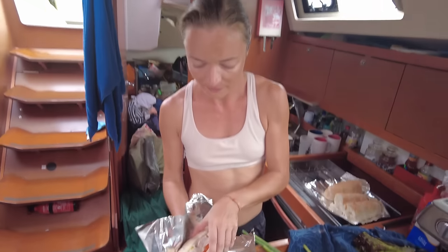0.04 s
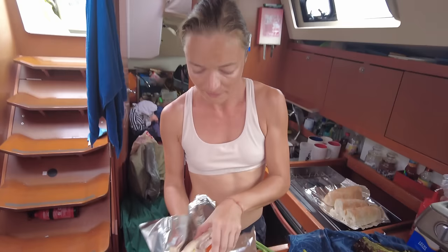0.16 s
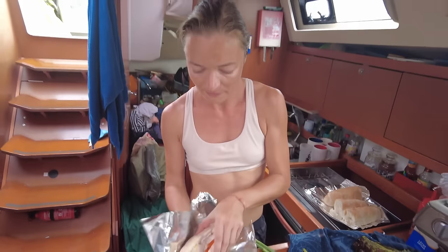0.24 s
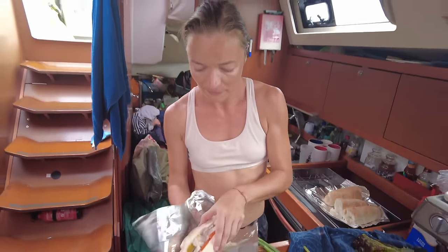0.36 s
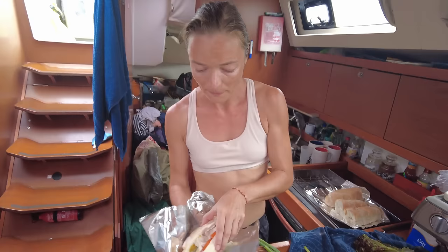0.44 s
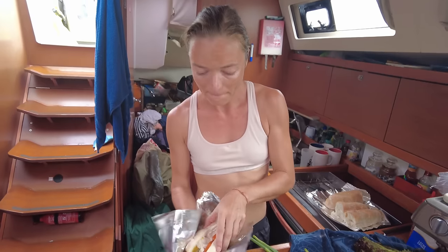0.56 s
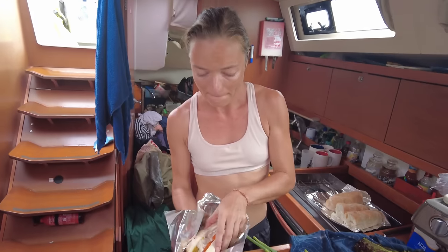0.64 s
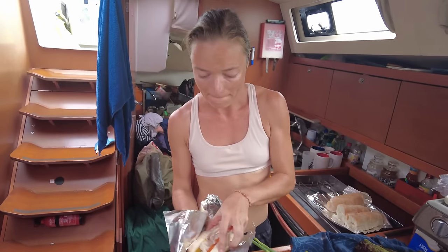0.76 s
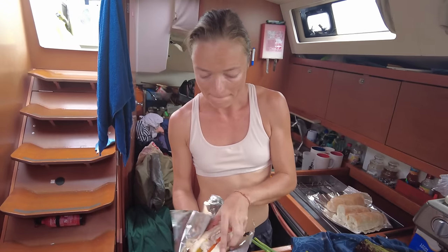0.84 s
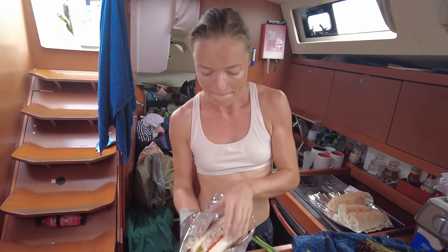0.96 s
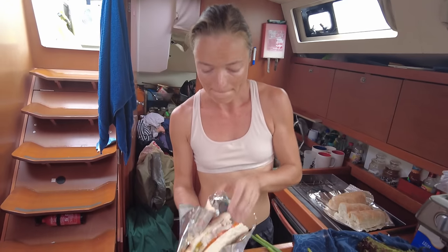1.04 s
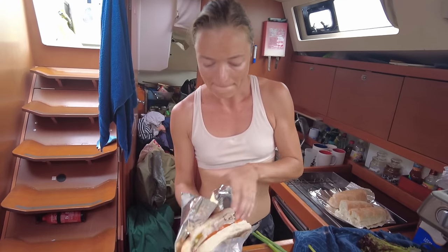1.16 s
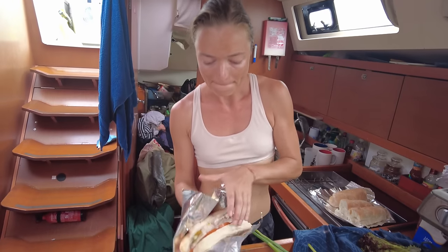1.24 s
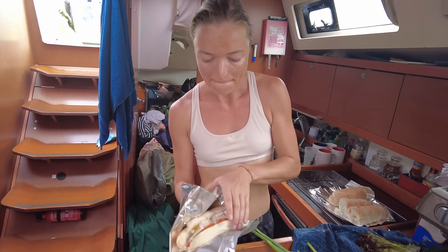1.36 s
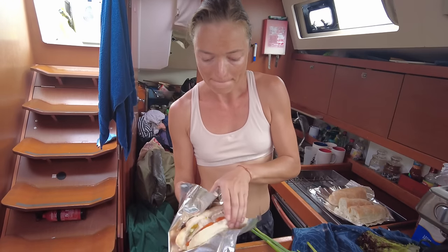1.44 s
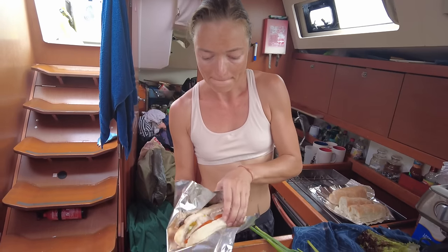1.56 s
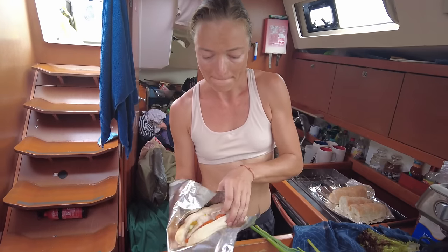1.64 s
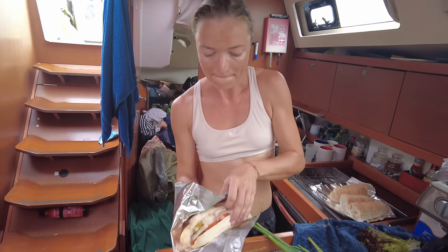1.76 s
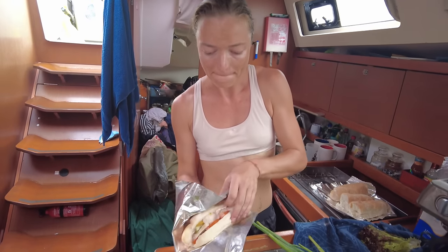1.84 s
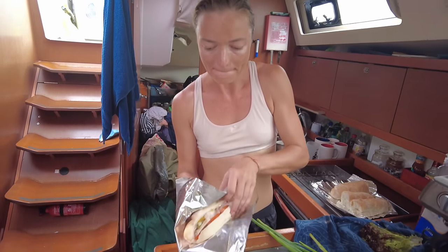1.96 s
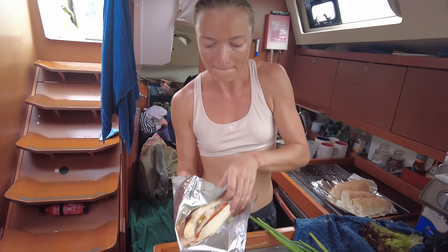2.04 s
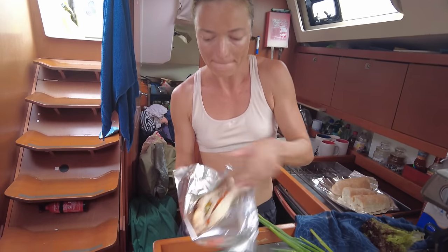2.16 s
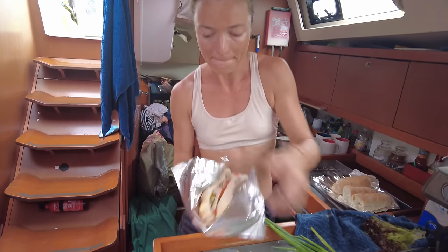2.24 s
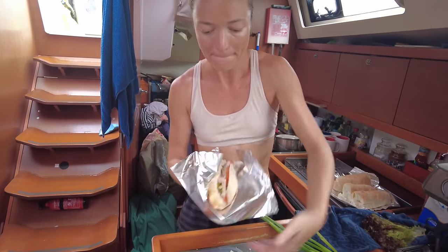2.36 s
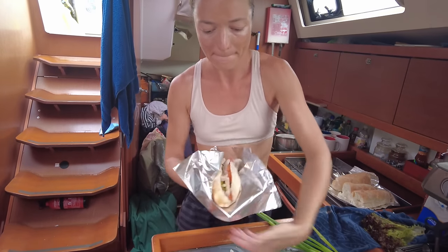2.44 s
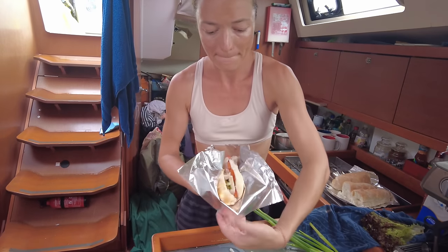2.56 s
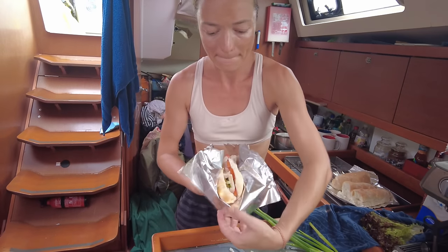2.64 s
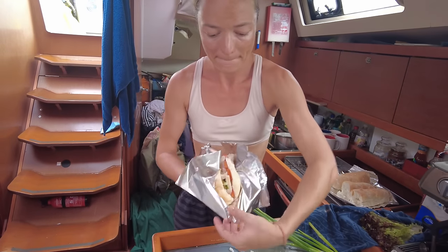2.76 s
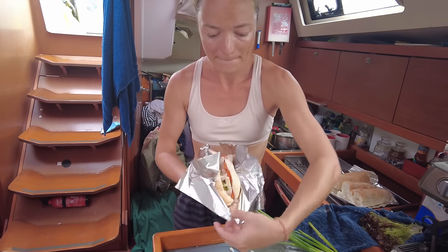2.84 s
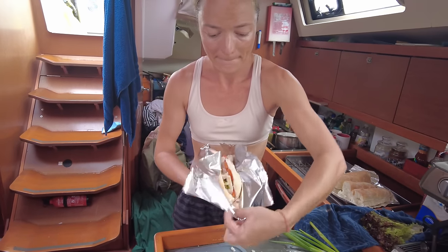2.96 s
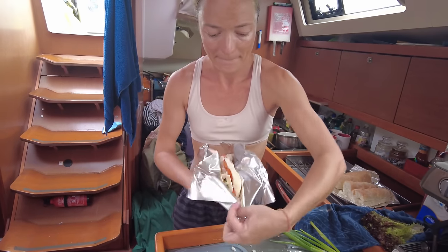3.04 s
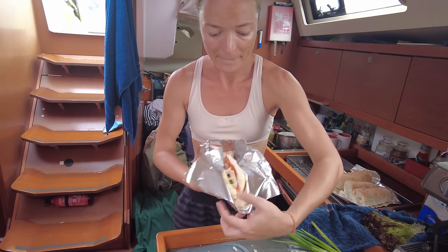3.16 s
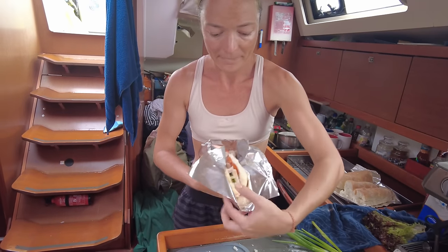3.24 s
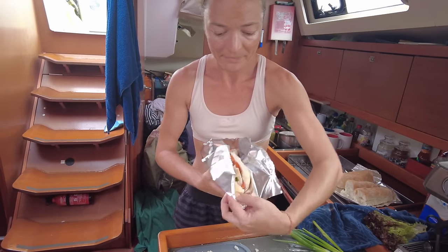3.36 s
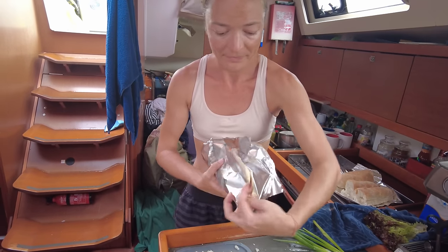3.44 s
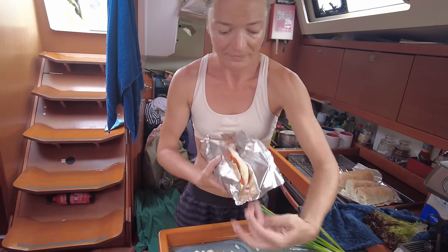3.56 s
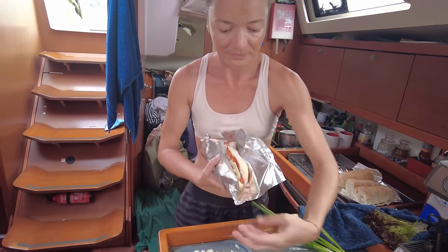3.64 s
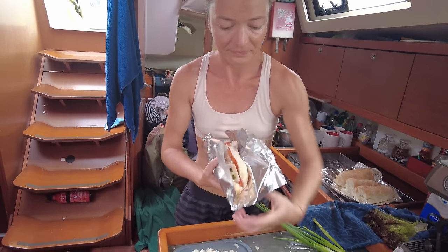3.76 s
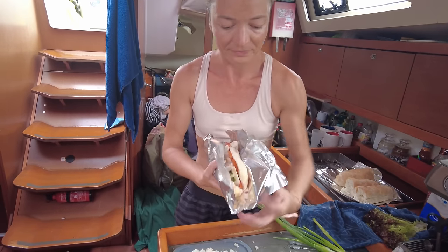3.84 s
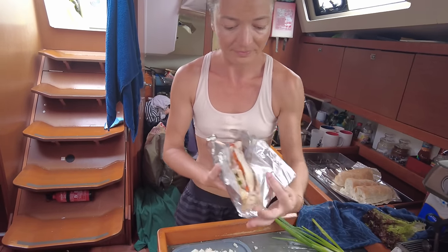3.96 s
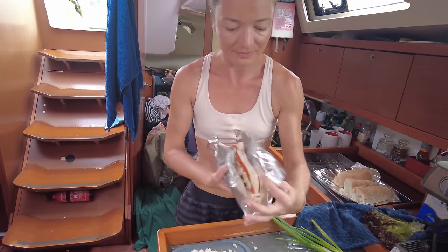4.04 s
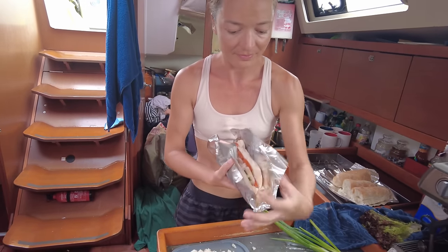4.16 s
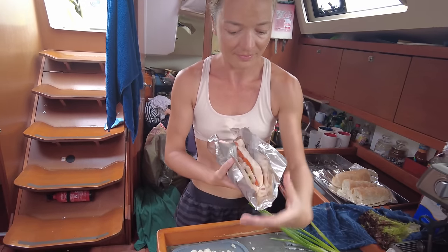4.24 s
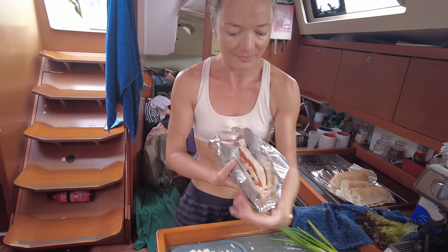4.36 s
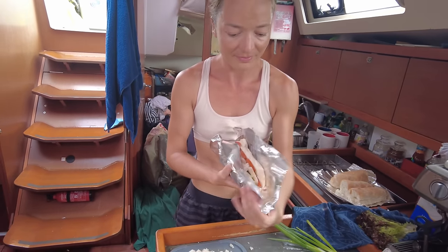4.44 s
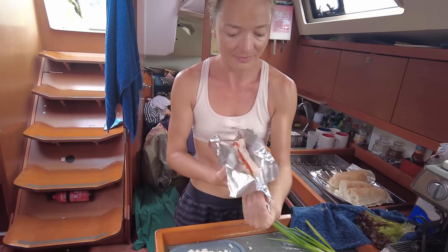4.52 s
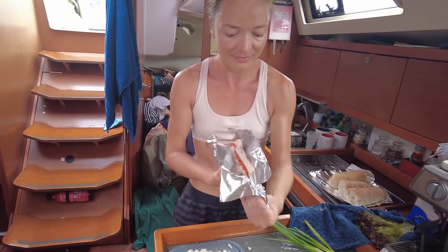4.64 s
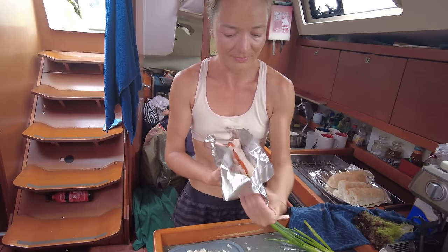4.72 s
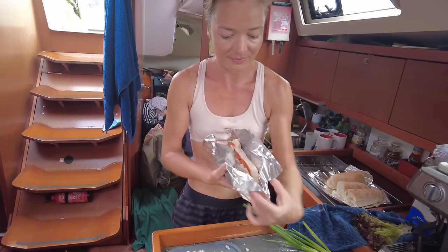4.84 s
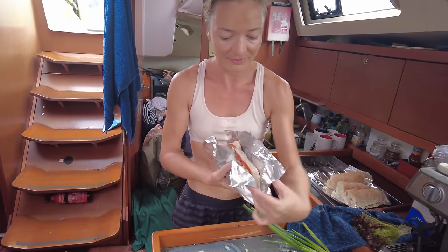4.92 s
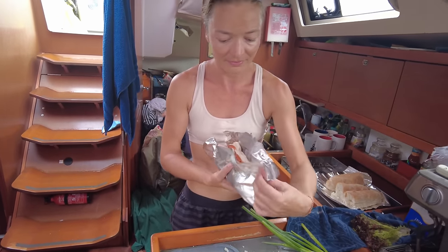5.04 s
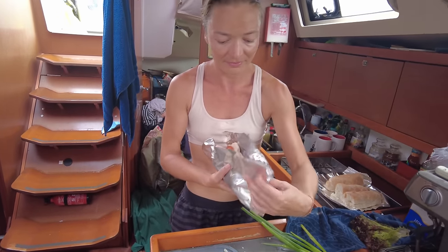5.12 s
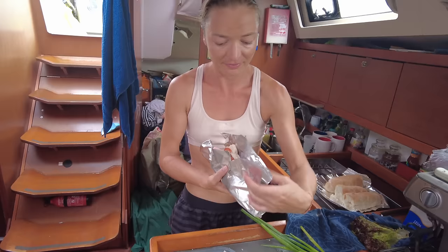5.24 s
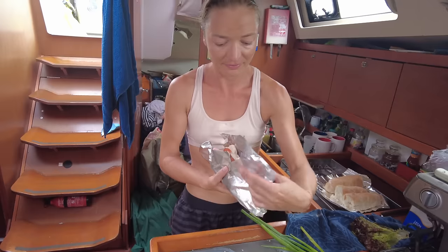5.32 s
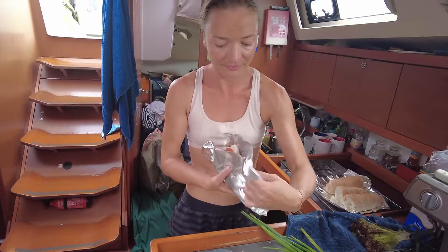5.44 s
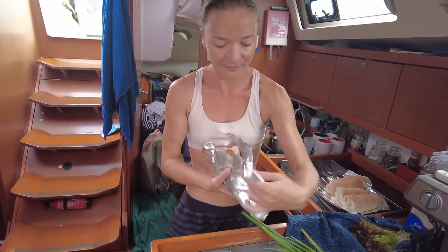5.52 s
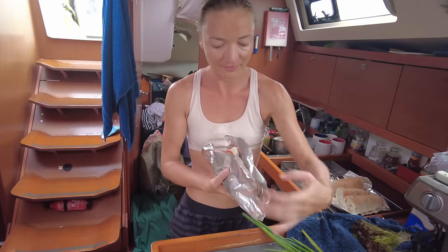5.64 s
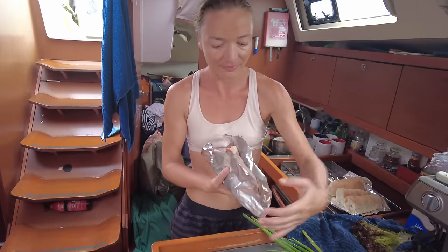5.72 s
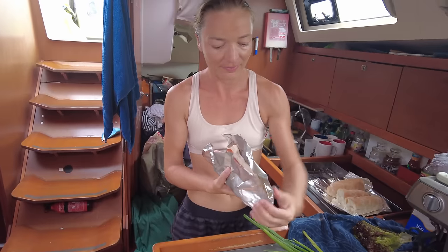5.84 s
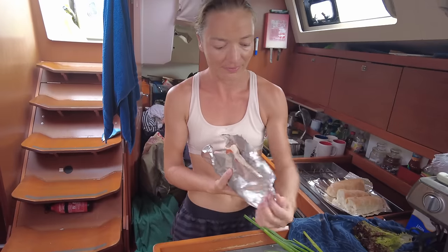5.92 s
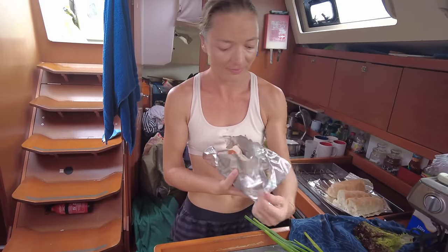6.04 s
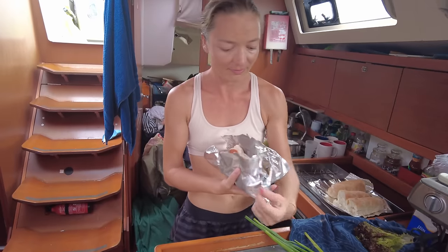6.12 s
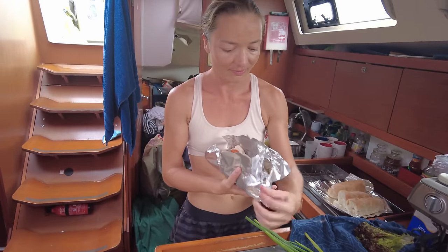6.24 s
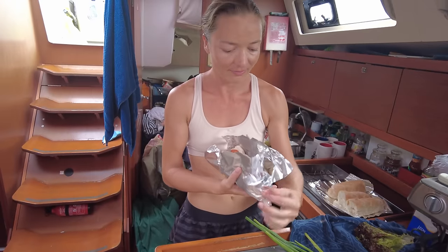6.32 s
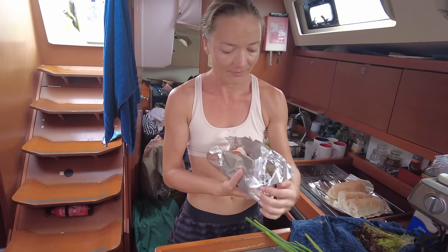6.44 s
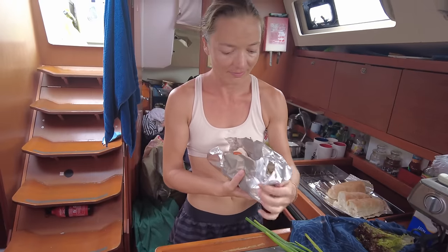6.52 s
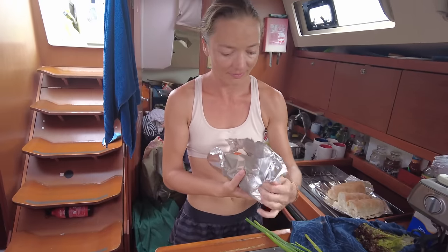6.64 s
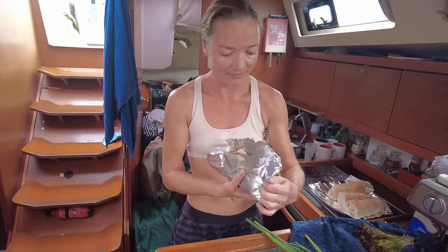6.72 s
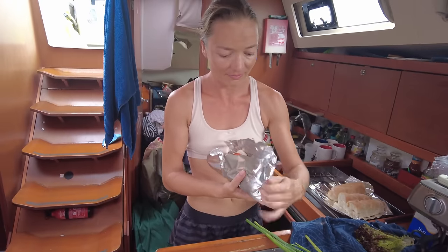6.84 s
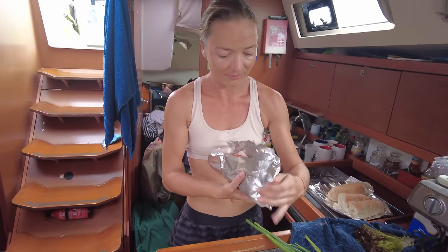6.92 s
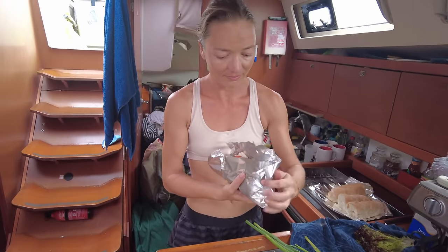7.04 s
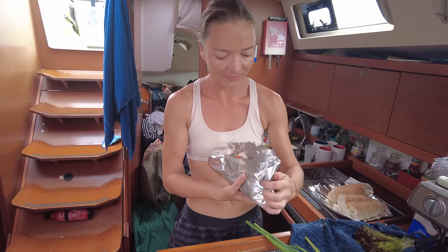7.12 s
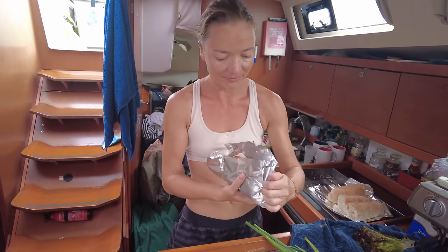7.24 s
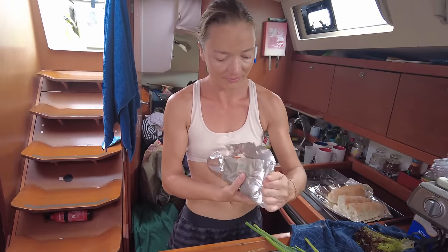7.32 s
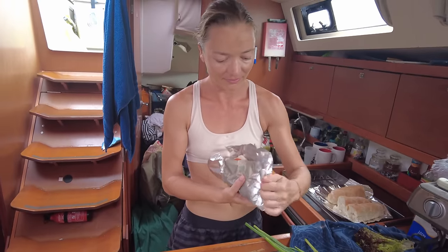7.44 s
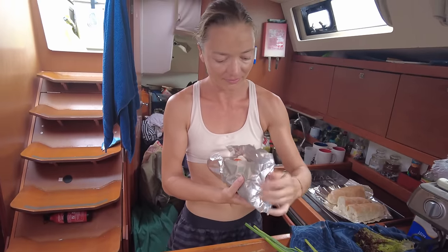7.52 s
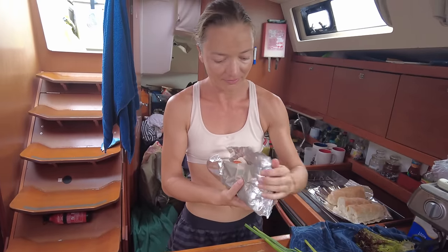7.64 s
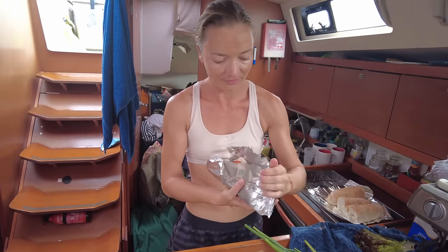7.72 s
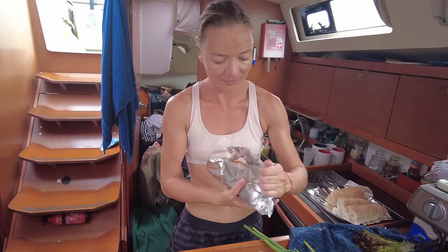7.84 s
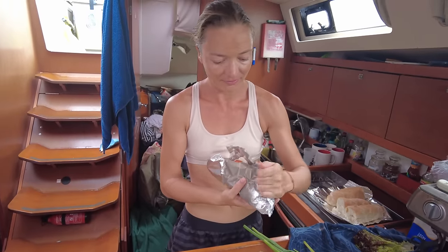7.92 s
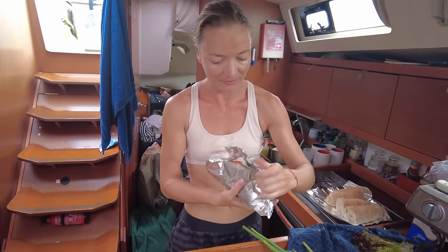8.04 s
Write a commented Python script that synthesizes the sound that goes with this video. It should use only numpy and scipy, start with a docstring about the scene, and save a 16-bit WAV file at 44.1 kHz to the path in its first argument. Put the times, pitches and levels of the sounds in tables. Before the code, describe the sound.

Close, bright foil crinkling with sharp snaps and a few soft hollow pats, over faint air noise and low machine hum.

```python
"""Foil wrapped around a sandwich

Aluminium foil is folded and pressed by hand around a sandwich in a small wood-panelled galley.
Finger pushes buckle creases in swarms of tiny clicks; larger facets snap in short avalanches, flat
patches ring, facets squeak, and the hand pats and squeezes the hollow parcel: filtered impulses, decaying
sines and resonated noise. Close walls thicken every click; air noise and machine hum lie underneath."""
import sys
import numpy as np
from scipy import signal
from scipy.fft import rfft, irfft
from scipy.io import wavfile
from scipy.ndimage import uniform_filter1d

SR = 44100
rng = np.random.default_rng(int(sys.argv[2]) if len(sys.argv) > 2 else 0)


def store_wav(level_fs):
    """Save 16-bit WAV to argv[1]."""
    pcm = np.round(np.clip(np.atleast_2d(level_fs), -1, 1) * 32767)
    wavfile.write(sys.argv[1], SR, pcm.T.astype(np.int16))


N = 356416
# large facets that snap through: start_s, relative_level_db, facet_pitch_hz, low_share_db
FACET_SNAPS = [(0.0381, -20.5, 7640.0, 5), (0.1037, -23, 2760.0, -1), (0.143, -19.5, 5710.0, -1),
               (0.182, -15, 6900, -1), (0.309, -16.0, 6200, -3), (0.426, -17.5, 9500.0, -5),
               (0.859, -20.5, 5310.0, -1), (0.9367, -10, 2740, -8), (0.969, -18, 3400, -3),
               (1.094, -14.5, 9160.0, 3.5), (1.3337, -18, 9500.0, 2), (1.463, -18.5, 3310.0, -8),
               (1.589, -21, 2300, 0), (1.848, -25.5, 7920.0, 1.5), (2.002, -20.5, 9500.0, -5),
               (2.04, -14.5, 4590.0, -5), (2.2333, -25.5, 9500.0, 0), (2.282, -14.5, 2300.0, -5),
               (2.537, -36, 6600.0, 5), (2.569, -25.5, 9600, -4), (2.661, -24, 2970.0, 4),
               (2.704, -14, 7100.0, -3.5), (2.759, -12.5, 9500.0, -1), (2.8409, -16.5, 6370.0, 2.5),
               (2.946, -18, 2300.0, 5), (3.025, -9.5, 9500.0, 1), (3.3716, -13, 5920.0, -5),
               (3.4505, -8.5, 7640.0, -7), (3.8496, -43, 3560.0, 2), (3.932, -24.5, 6370.0, 1),
               (3.9564, -14, 9500.0, -12), (4.028, -14, 4200, -2), (4.061, -9, 9400, 0),
               (4.112, -12, 7200, 4), (4.156, -18, 9000, 5.5), (4.245, -15, 9600, -1.5),
               (4.428, -49, 6200, -3), (4.459, -43, 6000, 3), (4.485, -20, 9500.0, 1),
               (4.621, -16.5, 2300.0, -0.5), (4.715, -19, 5300, 5), (4.7738, -16, 7640.0, 1),
               (4.8596, -18.5, 3080.0, -2), (5.157, -13.5, 4270.0, 3), (5.5997, -12.5, 4760.0, -9),
               (5.639, -14, 3310.0, -5), (5.882, -23, 4270.0, -14), (5.956, -20, 4590.0, 0),
               (5.966, -14.5, 4120.0, 1), (6.084, -12.5, 7100.0, 6), (6.384, -23.5, 3080.0, -4),
               (6.47, -21.5, 6370.0, 4.5), (6.609, -14.5, 8520.0, 1.5), (6.7184, -12.5, 3460, 3.5),
               (6.797, -22, 3970.0, 1), (6.9035, -24, 6200, -4), (7.006, -15, 3690.0, 7.5),
               (7.153, -19, 9500.0, 0), (7.226, -24, 7900, 0), (7.306, -18.5, 4430.0, 9),
               (7.3824, -15, 4900, 0.5), (7.5913, -18, 4940.0, -6), (7.681, -27.5, 6600.0, 1),
               (7.712, -27.5, 3690.0, 11), (7.7453, -16.5, 5120.0, -4), (7.946, -14.5, 4000, -6)]
# colour of the crumpling sheet: frequency_hz, relative_level_db
SHEET_COLOUR = [(60, -27), (170, -10.5), (300, -9.5), (470, -3.5), (700, -5), (1100, -4), (1900, -6),
                (2750, -2.5), (3600, -3.5), (4600, 1), (5800, -1), (7300, 1.5), (11000, -4), (16000, -7)]
# bands of about a third of an octave
EDGES_HZ = np.geomspace(90, 17500, 25)
CENTRES_HZ = np.sqrt(EDGES_HZ[1:] * EDGES_HZ[:-1])


def from_db(db):
    """Decibels to gain."""
    return 10 ** (np.asarray(db) / 20)


def rms_one(x):
    """Scale to rms 1."""
    return x / np.sqrt(np.mean(x ** 2) + 1e-20)


def in_time(rows):
    """Interpolate each column of a curve at every sample."""
    s, *columns = np.transpose(rows)
    return [np.interp(np.arange(N) / SR, s, column) for column in columns]


def at_hz(points, hz):
    """Read a table on a log-frequency axis."""
    table_hz, values = np.transpose(points)
    return np.interp(np.log(hz), np.log(table_hz), values)


def bandpass(x, edges_hz):
    """Butterworth band-pass."""
    sos = signal.butter(2, edges_hz, "band", fs=SR, output="sos")
    return signal.sosfilt(sos, x + 1e-18)


def resonate(x, hz, width_hz):
    """Two-pole resonance with gain 1 on top."""
    r = np.exp(-np.pi * width_hz / SR)
    zeros = np.array([1, 0, -1]) * (1 - r * r) / 2
    poles = [1, -2 * r * np.cos(2 * np.pi * hz / SR), r * r]
    return signal.lfilter(zeros, poles, x + 1e-18)


def clicks(at, sizes):
    """Impulses of the given sizes at the given samples."""
    return np.bincount(np.clip(at, 0, N - 1).astype(int).ravel(), np.ravel(sizes), N)


def pulse(shape_db):
    """Minimum-phase pulse: the sharpest causal click with the given spectrum."""
    cepstrum = irfft(np.log(from_db(shape_db)))
    half = len(cepstrum) // 2
    causal = np.r_[cepstrum[0], 2 * cepstrum[1:half]]
    return irfft(np.exp(rfft(causal, 2 * half)))


def drift(rate_per_s):
    """Smooth random wander with about `rate_per_s` turns a second, rms 1; low-passed noise."""
    step = 40  # samples between points
    sos = signal.butter(2, min(rate_per_s, SR / 100), fs=SR / step, output="sos")
    slow = signal.sosfilt(sos, rng.standard_normal(N // step + 1002))[1000:]  # drop the filter's start
    return np.interp(np.arange(N) / step, np.arange(len(slow)), rms_one(slow))


def background(air_db, waver_db):
    """Steady air noise, wavering hum lines of machinery, and a small motor that drones, then slows."""
    # quiet air of the cabin: frequency_hz, relative_level_db
    air_colour = [(20, 0), (45, -2), (65, -4.5), (95, -11.5), (130, -15), (250, -14.5), (500, -17.5),
                  (1000, -19.5), (3000, -26.5), (8000, -41), (16000, -47)]
    # machinery aboard: frequency_hz, rms_level_db (before waver)
    hum_lines = [(17.5, -61), (27, -68.5), (53.5, -74), (90, -69.5), (100, -71), (108, -69)]
    # small motor: time_s, pitch_hz, rms_level_db (before waver)
    motor_curve = [(0, 47, -58), (1.2, 47, -67), (2.2, 47, -51.5), (2.8, 46, -59), (3.2, 40, -67),
                   (6.8, 40, -66.5), (8.08, 40, -77)]
    hz, t = np.arange(N // 2 + 1) * SR / N, np.arange(N) / SR
    spectrum = rfft(rng.standard_normal(N)) * from_db(at_hz(air_colour, hz + 1e-3)) * (hz > 12)
    air = rms_one(irfft(spectrum, N))
    hum = np.zeros(N)
    for line_hz, db in hum_lines:
        gain = from_db(db + waver_db * drift(0.85))
        hum += gain * np.sin(2 * np.pi * (line_hz * t + rng.random()))
    motor_hz, motor_db = in_time(motor_curve)
    motor_gain = from_db(motor_db + waver_db * drift(6))
    motor = motor_gain * np.sin(2 * np.pi * np.cumsum(motor_hz) / SR)
    return from_db(air_db) * air + np.sqrt(2) * (hum + motor)  # sine peak is sqrt(2) times rms


def push(start_s, length_s, db, swell_db, attack_s):
    """Gain of one push: it brushes, takes hold, swells or eases while it lasts, then dies away."""
    brush_db, brush_db_per_s = -20, 1100  # below the push; rise before the grip
    release_db_per_s = 523  # the sheet settles when let go
    t = np.arange(N) / SR - start_s
    swell = swell_db * (np.clip(t / length_s, 0, 1) - .5)
    release = release_db_per_s * np.clip(t - length_s, 0, .5)
    brush = from_db(brush_db + brush_db_per_s * np.clip(t, -.5, 0))
    grip = np.clip(t / max(attack_s, 1e-3), 0, 1)
    return np.maximum(brush, grip) * from_db(db + swell - release)


def handling():
    """Sum the power of all pushes: effort dB, broad and fine share dB, facet Hz; the strongest dominates."""
    # finger pushes: start_s, length_s, effort_db, swell_db (start to end), attack_s,
    # broad_facet_share_db, finest_crease_share_db, facet_pitch_hz
    finger_pushes = [(0, 0.074, -44.0, -10.5, 0.0068, 3.5, 1, 7450.0),
                     (0.098, 0.058, -41, 6, 0.013, 2.5, -2, 6080.0),
                     (0.174, 0.11, -34, -9.5, 0.031, -1.5, 1, 2200.0),
                     (0.298, 0.12, -37.5, -0.5, 0.017, 0.5, 3, 6080.0),
                     (0.406, 0.084, -26, -11.5, 0.038, -4, 0, 2700.0),
                     (0.493, 0.23, -31.0, -3.5, 0.047, 0.0, 2.5, 2700.0),
                     (0.726, 0.124, -39.0, -10, 0.051, 3.5, 0.5, 6330.0),
                     (0.835, 0.14, -35, -1, 0.028, -3, 0, 2930.0),
                     (1.008, 0.1, -33.5, -9.5, 0.024, 0.5, 3.5, 6590.0),
                     (1.074, 0.1, -41, -3, 0.008, 1, 1, 5600.0),
                     (1.284, 0.162, -41.5, -5, 0.054, -1.5, 1.5, 7150.0),
                     (1.448, 0.17, -36.0, 2.5, 0.019, -1.5, 1, 1530.0),
                     (1.64, 0.15, -40, 1, 0.041, 2, 3, 2120.0),
                     (1.839, 0.12, -38.0, -2.5, 0.043, -0.5, 1, 1350.0),
                     (1.977, 0.119, -37, 6, 0.011, 1, 1.5, 3050.0),
                     (2.095, 0.09, -47.5, -3, 0.023, 8.5, 2, 6080.0),
                     (2.221, 0.07, -41, 24, 0.009, 3.5, 3.0, 6590.0),
                     (2.329, 0.13, -50.5, -9, 0.017, 3, -4.5, 3180.0),
                     (2.546, 0.032, -49, -8, 0.033, 5, 4.0, 1800.0),
                     (2.653, 0.128, -35.5, 12, 0.019, 1.5, 4.5, 6080.0),
                     (2.8, 0.118, -38.0, 9, 0.033, 0, 3, 6400),
                     (2.924, 0.21, -32.5, 0, 0.023, 1, 3, 6080.0),
                     (3.17, 0.2, -36.0, -15, 0.028, -5, 0.5, 2200.0),
                     (3.359, 0.24, -33.5, -0.5, 0.0067, 2.5, 4.5, 6870.0),
                     (3.584, 0.09, -36.5, -5.5, 0.017, 1.0, 0.0, 7450.0),
                     (3.938, 0.18, -31, 0.5, 0.021, 0, 9, 6590.0),
                     (4.141, 0.15, -46.5, -22.5, 0.0089, 3.5, 4, 5380.0),
                     (4.474, 0.12, -30.0, 8.5, 0.007, -2, 3, 2030.0),
                     (4.641, 0.079, -35.0, 2.5, 0.039, 2.0, 1.5, 6100),
                     (4.744, 0.296, -40, 4, 0.026, -2.0, 1.5, 1730.0),
                     (5.026, 0.19, -28.0, -4.5, 0.048, -0.5, 1.5, 1530.0),
                     (5.235, 0.114, -35, -12, 0.044, -2.0, -0.5, 1800.0),
                     (5.349, 0.11, -30.5, 6.5, 0.013, 1.5, 3.5, 4390.0),
                     (5.467, 0.1, -36, -16.5, 0.038, 1.5, 1, 1730.0),
                     (5.559, 0.094, -34.5, 4.5, 0.013, 0, 2, 3730.0),
                     (5.872, 0.099, -39.5, 2, 0.015, -0.5, 0, 4050.0),
                     (5.944, 0.182, -32.0, 3, 0.014, 0.5, 1, 4800),
                     (6.131, 0.21, -38, -12, 0.017, -1.5, -1, 1800.0),
                     (6.477, 0.14, -40.5, -4.5, 0.0092, -1, -2, 9120.0),
                     (6.564, 0.194, -35.5, 1, 0.04, 1.5, 1, 5300),
                     (6.757, 0.066, -41, 3, 0.017, -1.5, 1, 3890.0),
                     (6.857, 0.15, -41.5, 2.5, 0.046, 2.5, 1, 5380.0),
                     (6.99, 0.057, -35, -6, 0.014, 0, 0.5, 4220.0),
                     (7.118, 0.14, -43.0, 18, 0.031, 2.0, -1.0, 1800.0),
                     (7.262, 0.16, -34.5, -3.5, 0.017, 2, 0.5, 5170.0),
                     (7.481, 0.11, -37.5, -13.5, 0.051, 2, -1, 5380.0),
                     (7.678, 0.112, -41.5, 8.5, 0.024, 3, -2.0, 4960.0),
                     (7.795, 0.22, -36, -5, 0.017, 0, 0.5, 1780),
                     (8.028, 0.047, -45, 11, 0.031, 4, 0, 4580.0)]
    rest_db = -73  # the held sheet still stirs between pushes
    power, colour = np.full(N, from_db(rest_db) ** 2), np.zeros((3, N))
    for row in np.array(finger_pushes):
        own_power = push(*row[:5]) ** 2
        power += own_power
        colour += np.outer(row[5:], own_power)
    return 10 * np.log10(power), *(colour / power)


def creases(hands, per_s, crowding, spread_db, colour_db, even_s, hold_db, hold_s, level_db, size):
    """Swarms of tiny, sharp buckles, denser with effort; their colour shifts as folds travel over the sheet."""
    uneven_db, uneven_per_s = 1.0, 24  # the foil yields unevenly
    peak_db, peak_octaves = 2.5, 0.21  # facets under the finger stand out
    effort_db, *shares_db, facet_hz = hands
    effort_db = effort_db + uneven_db * drift(uneven_per_s)
    rate = per_s * from_db(crowding * (effort_db - np.median(effort_db)))
    at = np.flatnonzero(rng.random(N) < rate / SR)
    size_db = spread_db * np.minimum(rng.exponential(1, N), 4)
    sizes = from_db(size_db)[at] * rng.choice([-1, 1], N)[at]
    # the hands feed in energy steadily; the buckles of each moment share it
    power = uniform_filter1d(clicks(at, sizes ** 2), int(even_s * SR) + 1)[at]
    # the sheet holds stiller while stress builds toward the next snap
    snap_s = np.append(np.sort(np.array(FACET_SNAPS)[:, 0]), np.inf)
    until_snap_s = snap_s[np.searchsorted(snap_s, at / SR)] - at / SR
    holding = np.exp(-until_snap_s / hold_s)
    gain = from_db(effort_db[at] + level_db + hold_db * holding)
    swarm = clicks(at, sizes / np.sqrt(power + 1e-9) * gain)
    # broad facets radiate the lows, the finest creases the top
    hz = np.linspace(1, SR / 2, size + 1)
    broad_reach = at_hz([(1200, 0.98), (2800, 0.83), (5000, .02)], hz)
    fine_reach = at_hz([(7000, 0), (12000, 0.85)], hz)
    reach = np.array([broad_reach, fine_reach])
    out, sheet_db, shares_db = np.zeros(N + SR), at_hz(SHEET_COLOUR, hz), np.array(shares_db)
    for start in range(0, N, size):
        chance_db = np.interp(hz, CENTRES_HZ, rng.normal(0, colour_db, len(CENTRES_HZ)))
        octaves = np.log2(hz / max(facet_hz[start], 1))
        facet_db = peak_db * np.exp(-.5 * (octaves / peak_octaves) ** 2)
        share_db = shares_db[:, start:start + size].mean(axis=1) @ reach
        click = pulse(sheet_db + share_db + facet_db + chance_db)
        burst = signal.fftconvolve(swarm[start:start + size], click)
        out[start:start + len(burst)] += burst
    return out[:N]


def hollow(x, open_db, closed_db, width_hz):
    """Air between foil and bread resonates: first an open trough, lower once its end is folded over."""
    open_hz, closed_hz, closing_s = 510, 390, 3.75
    closed = np.arange(N) / SR > closing_s
    trough = (from_db(open_db) - 1) * resonate(x * ~closed, open_hz, width_hz)
    parcel = (from_db(closed_db) - 1) * resonate(x * closed, closed_hz, width_hz)
    return x + trough + parcel


def galley(x, early_db, early_s, tail_db, gap_s, wander_per_s, count):
    """Direct sound, scatter from sheet, body and counter, then the dying ring of the panelled room."""
    # parcel and galley: frequency_hz, width_hz, peak_gain_db
    resonances = [(276, 17, 3), (370, 20, 4.5), (700, 21, 3), (856, 31, 3), (996, 28, 5.5), (1202, 34, 3),
                  (1370, 51, 3), (1770, 50, 3.5), (2750, 920, 3), (7100, 330, 0.5)]
    # ring time of the galley: frequency_hz, t60_s
    ring_times = [(200, 0.18), (1400, 0.22), (3700, 0.22), (9700, 0.21), (16000, 0.045)]
    t = np.arange(SR // 3) / SR
    early = rng.standard_normal((count, len(t))) * np.exp(-t / early_s)
    tail = np.zeros((count, len(t)))
    for k, hz in enumerate(CENTRES_HZ):
        noise = bandpass(rng.standard_normal((count, len(t))), EDGES_HZ[k:k + 2])
        tail += noise * from_db(-60 * t / at_hz(ring_times, hz))
    tail = tail * (1 - np.exp(-(t / gap_s) ** 2))
    paths = from_db(early_db) * rms_one(early) + from_db(tail_db) * rms_one(tail)
    paths = paths / np.sqrt(len(t))
    # every source sits elsewhere and faces another way, so the echo paths keep changing
    weights = np.array([drift(wander_per_s) for path in paths])
    weights = weights / np.linalg.norm(weights, axis=0)
    wet = x + sum(signal.oaconvolve(x * weight, path)[:N] for weight, path in zip(weights, paths))
    wet = wet / np.sqrt(1 + from_db(2 * early_db) + from_db(2 * tail_db))
    return wet + sum((from_db(db) - 1) * resonate(wet, hz, width_hz) for hz, width_hz, db in resonances)


def pings(effort_db, per_s, level_db, spread_db, low_hz, high_hz, ring_s):
    """Dozens of times a second, at random, a taut, flat patch rings: decaying sines that follow effort."""
    out, t = np.zeros(N + SR), np.arange(SR // 12) / SR
    at = np.flatnonzero(rng.random(N) < per_s / SR)
    for i, (pitch, strength) in zip(at, rng.random((N, 2))[at]):
        hz = low_hz * (high_hz / low_hz) ** pitch
        gain = from_db(effort_db[i] + level_db + spread_db * (strength - .5))
        out[i:i + len(t)] += gain * np.sin(2 * np.pi * hz * t) * np.exp(-t / ring_s)
    return out[:N]


def flips(effort_db):
    """Lesser snaps at random moments, their level following the effort; columns as in FACET_SNAPS."""
    per_s, over_effort_db, spread_db = 14, 10, 2.2
    low_hz, high_hz = 2400, 9000
    at = np.flatnonzero(rng.random(N) < per_s / SR)
    level_db = effort_db[at] + over_effort_db + spread_db * rng.standard_normal(N)[at]
    facet_hz = low_hz * (high_hz / low_hz) ** rng.random(N)[at]
    return np.column_stack([at / SR, level_db, facet_hz, np.zeros(len(at))])


def snaps(rows, level_db, follow_db, length_s, hurry, pitch_db, pitch_octaves, count, size):
    """A facet flips with one sharp click and sets off its neighbours; the facet gives the burst a pitch."""
    growth = .4  # dB of avalanche length per dB of snap level
    out, hz = np.zeros(N + SR), np.linspace(1, SR / 2, size + 1)
    usual_db = np.median(np.array(rows)[:, 1])
    for s, snap_db, facet_hz, low_db in rows:
        pitch = np.exp(-.5 * (np.log2(hz / facet_hz) / pitch_octaves) ** 2)
        lows = at_hz([(1200, 1), (3000, 0.12)], hz)
        click = pulse(at_hz(SHEET_COLOUR, hz) + pitch_db * pitch + low_db * lows)
        # most neighbours follow soon, a few straggle
        own_s = length_s * from_db(growth * (snap_db - usual_db))
        wait = (rng.random(count) ** hurry * own_s * SR).astype(int)
        avalanche = np.bincount(wait, from_db(follow_db) * rng.choice([-1, 1], count))
        avalanche[0] = 1
        burst = signal.fftconvolve(avalanche, click)
        out[int(s * SR):][:len(burst)] += from_db(snap_db + level_db) * burst
    return out[:N]


def pats(level_db, ring_s, rise_s, thud_db, thud_hz, thud_s):
    """A soft touch on the wrapped bread: hollow knock of the wrapping, dull thud of the bread."""
    # finger pats: start_s, relative_knock_db, knock_pitch_hz, relative_thud_db
    finger_pats = [(0.429, -30, 490, -68), (2.037, -37, 514, -53), (2.705, -34, 520, -72),
                   (3.034, -31, 420, -62), (3.051, -26.5, 427, -62), (3.324, -33, 535, -63),
                   (3.39, -35, 530, -60), (4.111, -46, 368, -69), (5.062, -38, 407, -56.5),
                   (5.156, -28.5, 434, -47), (5.215, -31, 390, -50), (5.36, -31, 402, -46),
                   (5.426, -34, 393, -43.5), (5.637, -35, 380, -44), (6.469, -42, 400, -65),
                   (6.857, -39.5, 384, -61), (7.002, -39, 490, -65), (7.709, -44.5, 380, -58)]
    out, t = np.zeros(N + SR), np.arange(SR // 10) / SR
    for s, knock_db, hz, bread_db in finger_pats:
        knock = from_db(knock_db + level_db) * np.sin(2 * np.pi * hz * t) * np.exp(-t / ring_s)
        thud = from_db(bread_db + thud_db) * np.sin(2 * np.pi * thud_hz * t) * np.exp(-t / thud_s)
        out[int(s * SR):][:len(t)] += (knock + thud) * (1 - np.exp(-t / rise_s))
    return out[:N]


def squeaks(width_hz):
    """Foil rubs on foil: a brief slide drives one facet at its own pitch; noise resonated twice."""
    # slides: half_height_rise_s (moment the swell reaches half height), relative_level_db, pitch_hz,
    # half_height_length_s
    slides = [(0.926, -36, 2660, 0.014), (0.966, -36, 3380, 0.0068), (6.797, -39, 4000, 0.016),
              (7.679, -35, 6600, 0.0031), (7.781, -38, 4900, 0.021)]
    out = np.zeros(N)
    for rise_s, db, hz, length_s in slides:
        swell = np.hanning(int(length_s * SR * 2))
        ring = resonate(rng.standard_normal(SR // 4), hz, width_hz)
        ring = rms_one(resonate(ring, hz, width_hz)[-len(swell):])
        out[int((rise_s - length_s / 2) * SR):][:len(swell)] += from_db(db) * swell * ring
    return out


def squeezing(level_db, low_hz, high_hz, per_s):
    """Pressed layers give way against the soft bread in small dull bumps: band-passed random impulses."""
    # hand squeezes: start_s, length_s, relative_level_db, swell_db
    hand_squeezes = [(3.99, .14, -50.5, 4), (4.508, 0.068, -51.5, 9), (5.068, 0.13, -48, -4),
                     (5.358, 0.083, -54, 1), (5.625, .035, -48, 2), (7.25, 0.083, -52, 4),
                     (7.52, .045, -55, -0.5)]
    force = sum(push(*row, attack_s=.012) for row in hand_squeezes)
    bumps = (rng.random(N) < per_s / SR) * rng.choice([-1, 1], N)
    dull = bandpass(bumps, [low_hz, high_hz])
    return from_db(level_db) * force * rms_one(dull)


def scene():
    """Foil and fingers in the galley, over the background."""
    hands = handling()
    effort_db = hands[0]
    foil = creases(hands, per_s=1700, crowding=.5, spread_db=3.5, colour_db=1.9, even_s=0.022,
                   hold_db=-1.0, hold_s=0.019, level_db=2.5, size=512)
    foil += snaps(FACET_SNAPS, level_db=5.5, follow_db=-6.5, length_s=.0058, hurry=1.5,
                  pitch_db=5.0, pitch_octaves=0.18, count=20, size=512)
    foil += snaps(flips(effort_db), level_db=4.5, follow_db=-6.5, length_s=.004, hurry=1.5,
                  pitch_db=10.5, pitch_octaves=0.18, count=12, size=512)
    foil += pings(effort_db, per_s=42, level_db=-6.5, spread_db=5, low_hz=900, high_hz=3600, ring_s=0.0089)
    foil = hollow(foil + squeaks(width_hz=670), open_db=4.5, closed_db=4.0, width_hz=50)
    fingers = pats(level_db=0.0, ring_s=0.0077, rise_s=0.0019, thud_db=14.5, thud_hz=186, thud_s=0.0042)
    fingers += squeezing(level_db=-3.5, low_hz=205, high_hz=340, per_s=200)
    # creases leap about the sheet from click to click, the fingers stay in place
    room = galley(foil, early_db=3.0, early_s=0.0053, tail_db=0.0, gap_s=0.0016,
                  wander_per_s=155, count=20)
    room += galley(fingers, early_db=-2.5, early_s=0.0025, tail_db=-5.5, gap_s=0.0019,
                   wander_per_s=6.0, count=4)
    return (room + background(air_db=-57.5, waver_db=2.5))[None]


def record(dry):
    """Cut the top steeply: elliptic low-pass."""
    cutoff_hz = 16100
    return signal.sosfilt(signal.ellip(12, .1, 80, cutoff_hz, fs=SR, output="sos"), dry)


dry = scene()
out = record(dry)
store_wav(out)
```